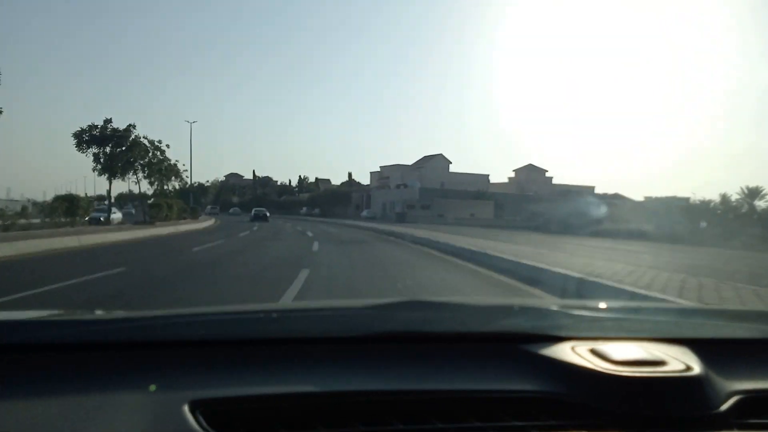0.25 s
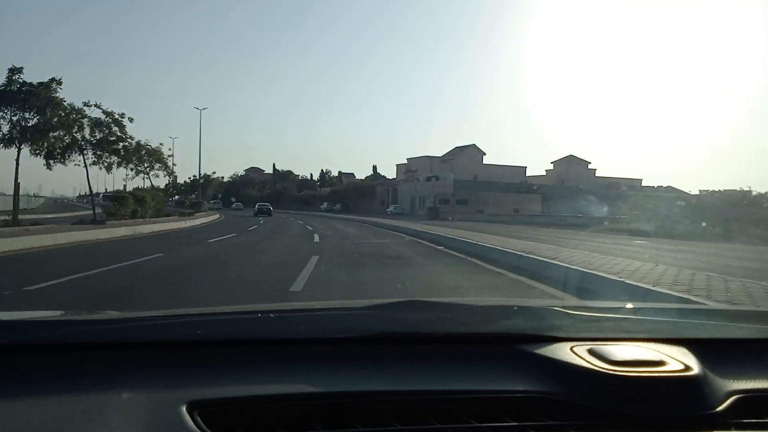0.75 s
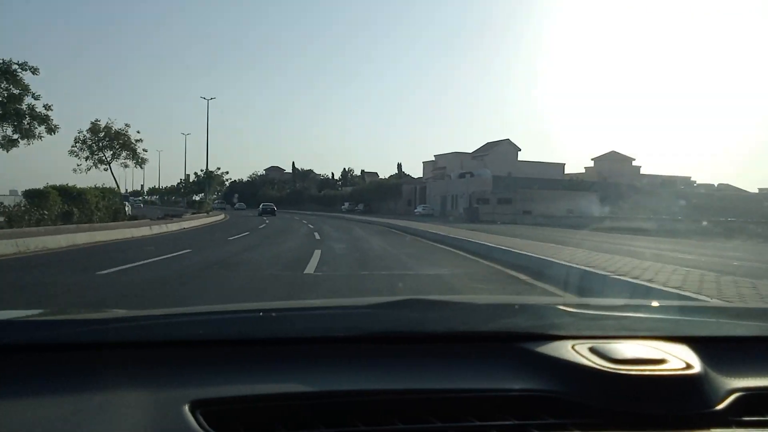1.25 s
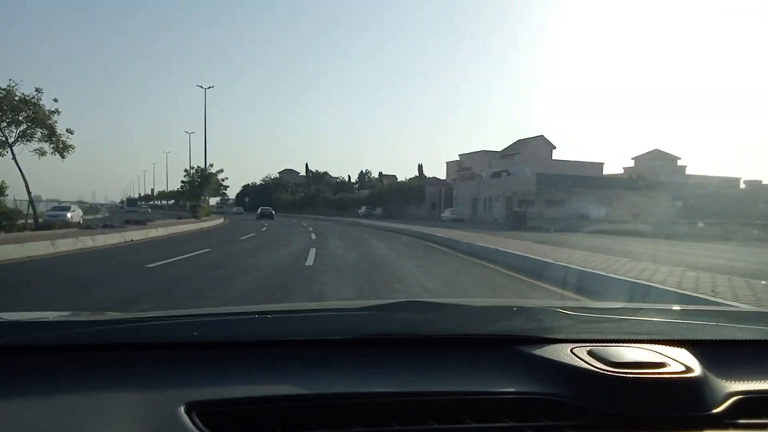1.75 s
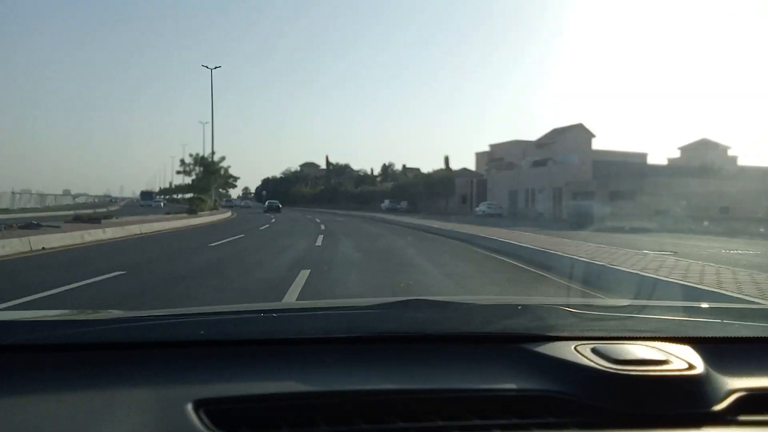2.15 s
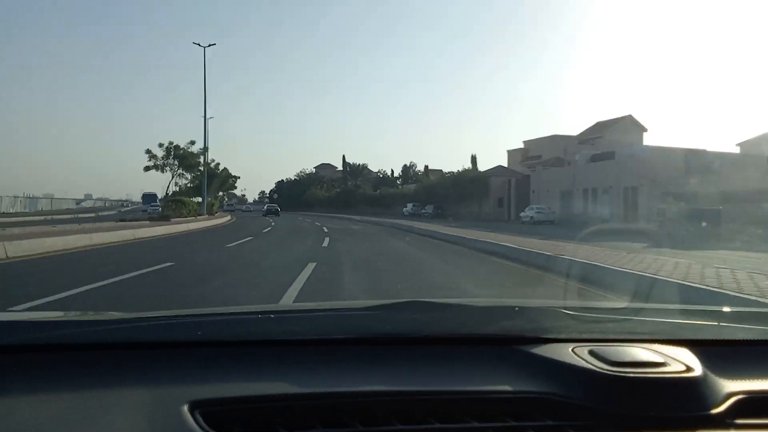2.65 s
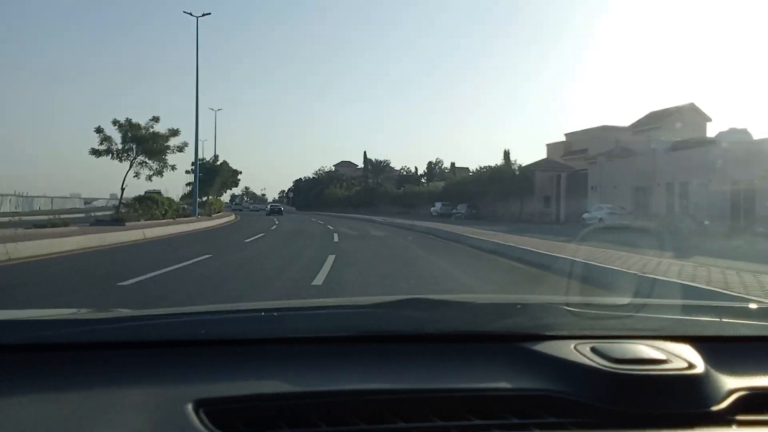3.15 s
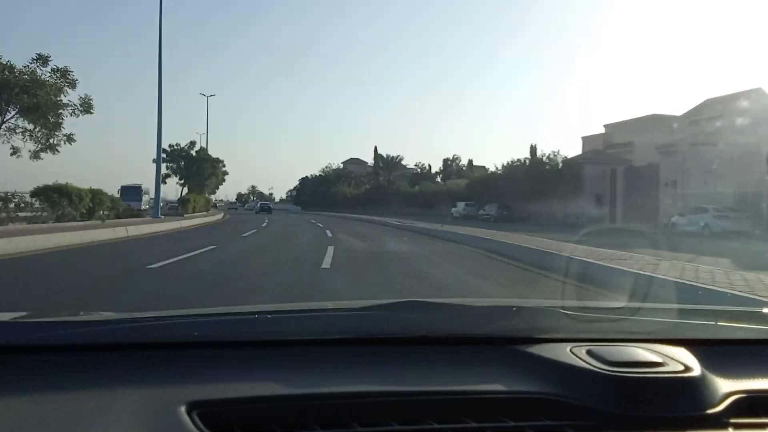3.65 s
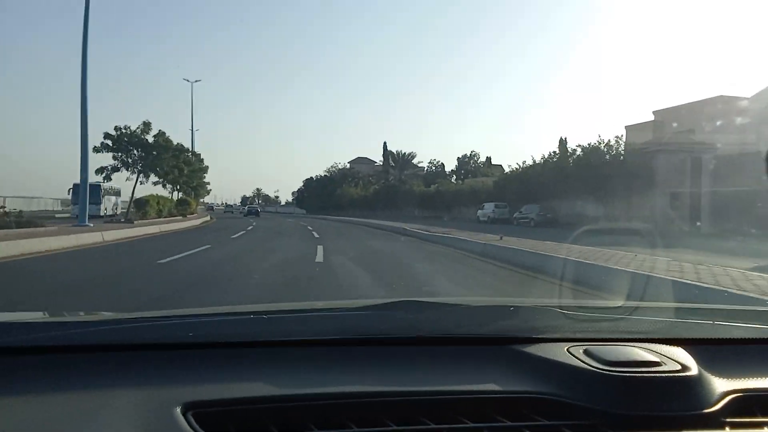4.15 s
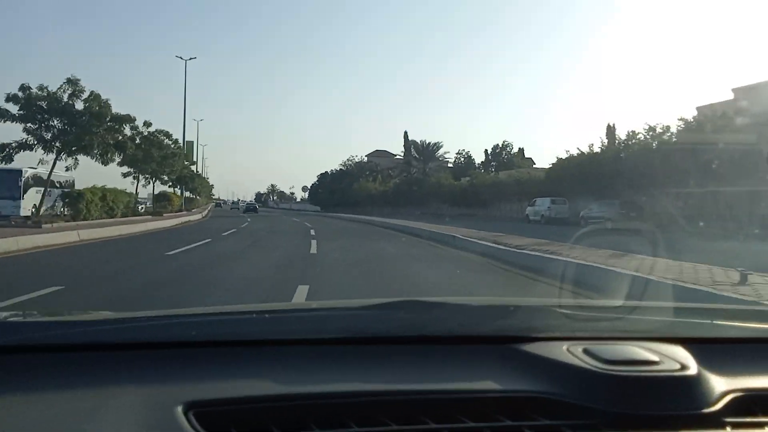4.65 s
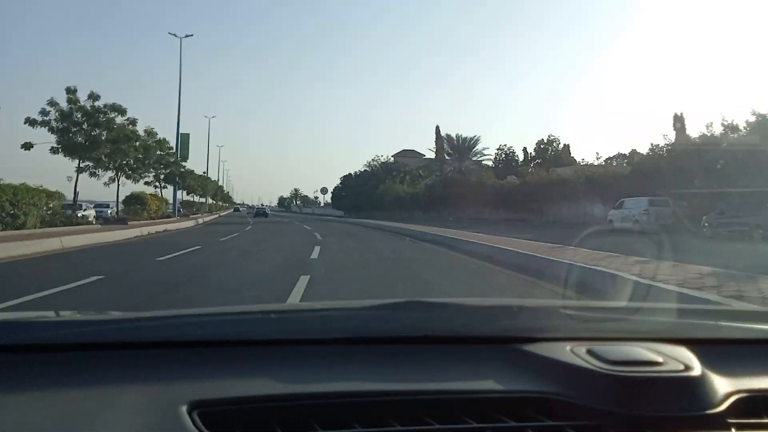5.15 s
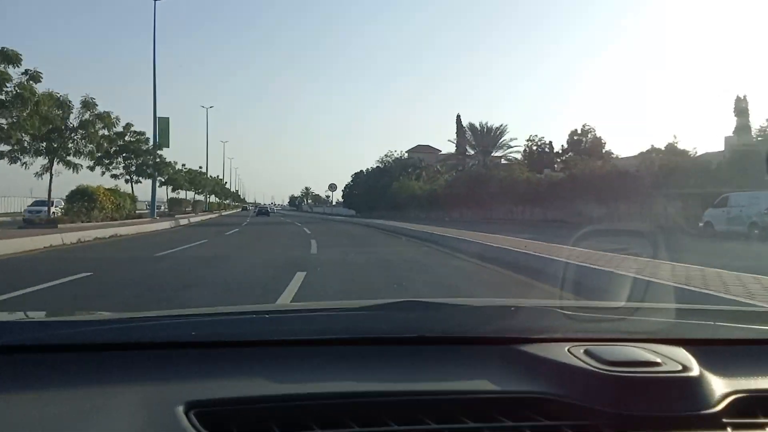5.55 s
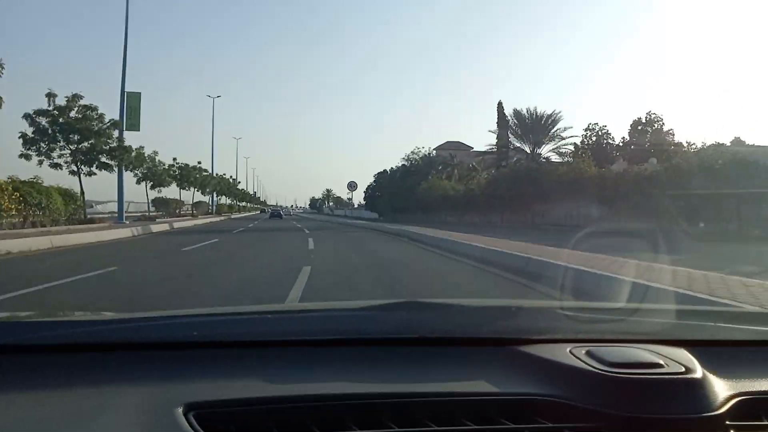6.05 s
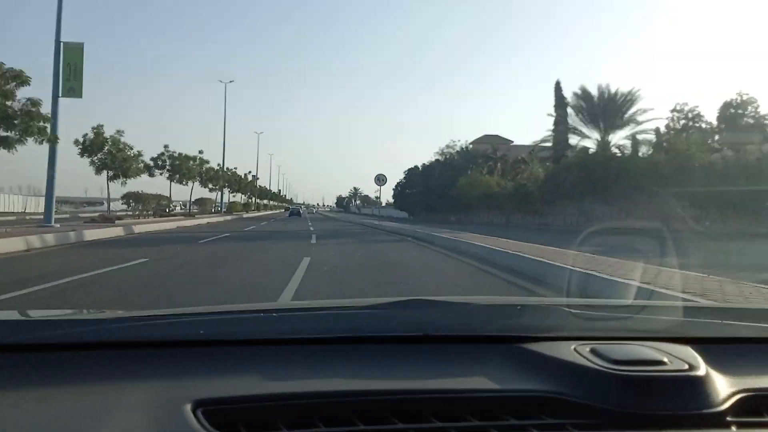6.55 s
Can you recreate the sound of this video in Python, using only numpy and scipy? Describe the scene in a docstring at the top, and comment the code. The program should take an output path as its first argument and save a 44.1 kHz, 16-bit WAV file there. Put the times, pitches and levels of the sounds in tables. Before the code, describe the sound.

Close, boxy cabin sound dominated by low road boom and droning tyres, with a muffled midrange rush that roughens and smooths. Short coarse hums swell as the surface changes. Soft low bumps come irregularly, strong near two, four and six and a half seconds, with dry plastic ticks and brief chatter at the last jolt. Faint engine and airflow stay behind.

```python
"""Tyres rolling on asphalt, heard from behind the dashboard of a cruising car: noise shaped by
resonances of body, tyres, panels and tread, plus a broad rush and humming coarse strips.
Bumps thump as short swelling sines with a noisy slap. Plastic trim ticks, creaks once and
chatters on the heaviest jolt, as struck modes and band-passed clicks.
Behind them: a faint engine hum (wandering sine) and a smooth hiss of air (coloured noise)."""
import sys
import numpy as np
from scipy import signal
from scipy.fft import rfft, irfft
from scipy.io import wavfile
from scipy.ndimage import uniform_filter1d

SR = 44100
rng = np.random.default_rng(int(sys.argv[2]) if len(sys.argv) > 2 else 0)


def dump_mix(stems):
    """Bounce the given channels to the path in sys.argv[1] as a 16-bit WAV at rate SR."""
    frames = np.atleast_2d(stems).T  # one column per channel
    limited = np.clip(frames, -1, 1)  # hard clip at full scale
    pcm = np.round(limited * 32767).astype(np.int16)
    wavfile.write(sys.argv[1], SR, pcm)


N = 299439
TIME_S = np.arange(N) / SR
BIN_HZ = np.arange(N // 2 + 1) * SR / N


def from_db(db):
    """Decibels to amplitude gain."""
    return 10 ** (np.asarray(db) / 20)


def rms_one(x):
    """Scale to unit power."""
    return x / np.sqrt(np.mean(x ** 2) + 1e-20)


def in_time(rows):
    """Interpolate each column of a curve table to every sample."""
    knot_s, *columns = np.transpose(rows)
    return [np.interp(TIME_S, knot_s, column) for column in columns]


def drift(rate_hz):
    """Slow random wander of spread 1: low-passed noise."""
    steps = 4096
    hz = np.arange(steps // 2 + 1) * SR / N
    spectrum = rfft(rng.standard_normal(steps)) / (1 + (hz / rate_hz) ** 2)
    slow = rms_one(irfft(spectrum))
    return np.interp(np.arange(N) * steps / N, np.arange(steps), slow)


def coloured_noise(colour):
    """Noise with a smooth spectrum, falling away below the first point; rms 1."""
    hz = np.maximum(BIN_HZ, 1)
    point_hz, level_db = np.transpose(colour)
    gain = from_db(np.interp(np.log(hz), np.log(point_hz), level_db))
    gain = gain / (1 + (point_hz[0] / 2 / hz) ** 2)
    return rms_one(irfft(rfft(rng.standard_normal(N)) * gain, N))


def shaken(modes):
    """Steep-sided resonances, each shaken at random by the road; rms 1."""
    power = np.zeros(len(BIN_HZ))
    for centre_hz, width_hz, level_db in modes:
        detune = 2 * (BIN_HZ - centre_hz) / width_hz
        power += from_db(level_db) ** 2 / (1 + detune ** 2) ** 2
    return rms_one(irfft(rfft(rng.standard_normal(N)) * np.sqrt(power), N))


def steadied(x, seconds):
    """Hold the slow level at 1 and keep the quick flutter."""
    window = max(int(seconds * SR), 2)
    return x / np.sqrt(uniform_filter1d(x ** 2, window) + 1e-9)


def clicks(rows):
    """One impulse for each (start_s, level_db) row."""
    out = np.zeros(N)
    for start_s, level_db in rows:
        out[min(int(start_s * SR), N - 1)] += from_db(level_db)
    return out


def ring(force, modes):
    """Each impulse sets every mode ringing; neighbouring modes swing in opposite senses."""
    out = np.zeros(N)
    for k, (pitch_hz, level_db, t60_s) in enumerate(modes):
        r = np.exp(-np.log(1000) / (t60_s * SR))
        w = 2 * np.pi * pitch_hz / SR
        mode = signal.lfilter([0, np.sin(w)], [1, -2 * r * np.cos(w), r * r], force + 1e-18)
        out += (-1) ** k * from_db(level_db) * mode
    return out


def cabin(x, wet_db, peak_s):
    """Reflections from glass and seats build up and die quickly; the upholstery dulls them."""
    t = np.arange(SR // 8) / SR
    tail = rng.standard_normal(len(t)) * t * np.exp(-t / peak_s)
    tail = tail / np.linalg.norm(tail)
    tail = signal.sosfilt(signal.butter(1, 2500, fs=SR, output="sos"), tail)
    return x + from_db(wet_db) * signal.fftconvolve(x, tail)[:N]


# colour of the passing air: point_hz, level_db (per Hz, relative)
AIR_COLOUR = [(1200, -3), (2000, 3.5), (2750, 6.5), (3200, -0.5), (3650, -4), (3900, -2), (4500, -3),
              (4720, -6), (4950, -5.5), (5250, -6), (6300, -7), (7200, -12.5), (8200, -20.5), (15000, -30)]
AIR_DB = -71.5


def airflow(flutter_db):
    """Smooth hiss of air along the windscreen, fluttering in level."""
    return from_db(AIR_DB + flutter_db * drift(23)) * coloured_noise(AIR_COLOUR)


ENGINE_HZ, ENGINE_DB = 69.9, -47


def engine(wander, unsteady_db):
    """Firing hum at nearly steady revs: a sine wandering in pitch and level."""
    pitch_hz = ENGINE_HZ * (1 + wander * drift(1.8))
    phase = 2 * np.pi * np.cumsum(pitch_hz) / SR
    return from_db(ENGINE_DB + unsteady_db * drift(8.1)) * np.sin(phase)


CRACK_OCTAVES = 1.5  # bandwidth


def crack(force, pitch_hz):
    """Dry, broad snap of a small plastic part: a band-passed impulse."""
    edges_hz = pitch_hz * 2 ** (CRACK_OCTAVES * np.array([-.5, .5]))
    band = signal.butter(2, edges_hz, "band", fs=SR, output="sos")
    return signal.sosfilt(band, force + 1e-18)


CHATTER_AT_S, CHATTER_HALF_S = 6.51, .045  # heaviest jolt
CHATTER_PEAK_PER_S, CHATTER_DB = 400, -42


def chatter(pitch_hz):
    """Many faint, uneven contacts of loose trim while the car is jolted."""
    rate_per_s = CHATTER_PEAK_PER_S * np.exp(-((TIME_S - CHATTER_AT_S) / CHATTER_HALF_S) ** 2)
    contacts = (rng.random(N) < rate_per_s / SR) * rng.standard_normal(N)
    return from_db(CHATTER_DB) * crack(contacts, pitch_hz)


# dashboard trim snaps: start_s, ring_db, crack_db, crack_hz
TICKS = [(2.0760, -35.5, -12.5, 2250), (2.575, -54, -37, 3500), (3.014, -57, -36, 3000),
         (4.9862, -61, -25, 2200), (5.381, -59, -35, 3000), (6.414, -51, -37, 4600),
         (6.483, -50.5, -32, 3600), (6.5262, -55, -25.5, 1900), (6.633, -38, -12.5, 2250),
         (6.776, -48, -24, 2050)]
# trim resonances: pitch_hz, level_db, t60_s
TRIM_MODES = [(1300, -27, .04), (1650, -17.5, .045), (2280, -24, .016), (2740, -23, .02), (3000, -25, .012),
              (4060, -29, .025), (4450, -8, .012), (4950, -10, .011), (5950, -23, .004), (7000, -23, .003)]
# slips of a creaking plastic joint: start_s, level_db (re strongest)
SLIPS = [(3.0730, -10), (3.0749, 0), (3.0793, -.5), (3.0821, -6), (3.0886, -13)]
# joint resonances: pitch_hz, level_db, t60_s
JOINT_MODES = [(1750, -19, .02), (2600, -19, .015), (3230, -14, .018), (3560, -14, .02), (3900, -7, .022),
               (4160, -6, .024), (4570, -10, .02), (4880, -14, .02), (5700, -15.5, .005), (6300, -22, .005),
               (7450, -33, .012)]
CREAK_DB = -44
TRIM_GAP_HZ, TRIM_GAP_Q = 3650, 3.5  # dead band between knock and ping
TRIM_DULL_HZ = 7000  # padded dashboard muffles the top
GLASS_ECHO_S, GLASS_ECHO_DB = .00202, -7  # nearby windscreen


def trim():
    """Parts snap with a crack and a short ring; a joint creaks in slips; the windscreen echoes."""
    snaps = np.zeros(N)
    for start_s, ring_db, crack_db, crack_hz in TICKS:
        snap = clicks([(start_s, 0)])
        snaps += from_db(ring_db) * ring(snap, TRIM_MODES)
        snaps += from_db(crack_db) * crack(snap, crack_hz)
    snaps = signal.lfilter(*signal.iirnotch(TRIM_GAP_HZ, TRIM_GAP_Q, fs=SR), snaps)
    dull = signal.butter(2, TRIM_DULL_HZ, fs=SR, output="sos")
    snaps = signal.sosfilt(dull, snaps + chatter(pitch_hz=2670))
    creak = from_db(CREAK_DB) * ring(clicks(SLIPS), JOINT_MODES)
    direct = snaps + creak
    echo = from_db(GLASS_ECHO_DB) * np.pad(direct, (int(GLASS_ECHO_S * SR), 0))[:N]
    return cabin(direct + echo, wet_db=-5.5, peak_s=.007)


# bumps under the wheels: crest_s, thump_db, pitch_hz, slap_db
BUMPS = [(0.178, -27, 205, -47.5), (0.313, -30.5, 76, -61), (0.354, -28, 70, -63), (1.095, -26.5, 203, -53),
         (1.549, -23, 170, -56), (1.617, -17, 206.6, -59), (1.671, -24, 67.5, -64), (1.707, -28.5, 85, -62),
         (1.79, -22, 76, -59), (1.809, -25.5, 153, -53), (1.876, -15, 158, -49), (1.942, -19.5, 78, -63),
         (2.055, -24.5, 192, -61), (2.095, -32, 74, -57), (2.131, -25.5, 147, -67), (2.174, -29.5, 75, -65),
         (2.264, -28.5, 66, -62), (2.347, -24, 175, -61), (2.527, -25.5, 149, -57), (2.583, -29, 66, -63),
         (2.661, -23.5, 196, -52), (2.988, -25, 205, -49), (3.842, -15, 189, -48),
         (3.861, -16.5, 204.4, -52), (3.972, -31, 75.6, -59), (4.157, -28, 179, -57),
         (4.366, -33, 76.6, -65), (4.691, -29, 70, -62), (4.831, -23, 191, -59), (4.905, -23, 185, -52),
         (5.028, -21.5, 173, -54), (5.046, -22.5, 186, -56), (5.13, -27.5, 70, -65.5),
         (5.237, -26, 78.4, -62), (5.446, -22.5, 72, -65), (5.543, -22, 193, -59), (5.648, -24, 139, -53),
         (6.273, -22.5, 185, -51.5), (6.352, -23.5, 149, -56), (6.374, -20.5, 69.5, -57.5),
         (6.427, -18.5, 86.6, -54), (6.458, -20.5, 136, -53), (6.513, -14.5, 81, -46),
         (6.533, -15, 119, -50), (6.543, -18, 205.5, -54), (6.557, -20.5, 74, -59),
         (6.769, -22.5, 73, -49.5)]
# colour of the tread's slap: point_hz, level_db (per Hz, relative)
SLAP_COLOUR = [(300, -18.5), (520, -5), (750, -10), (1000, -18.5), (1500, -24), (4000, -47.5), (8000, -69)]


def bumps(contact_s, rise_cycles):
    """Suspension thumps: a few low cycles swell and die away while the tread slaps."""
    out, slap = np.zeros(N), coloured_noise(SLAP_COLOUR)
    for crest_s, thump_db, pitch_hz, slap_db in BUMPS:
        rise_s = contact_s + rise_cycles / pitch_hz  # deep thumps build more slowly
        start = max(int((crest_s - rise_s) * SR), 0)
        age_s = TIME_S[:min(SR // 4, N - start)]
        span = slice(start, start + len(age_s))
        swell = (age_s / rise_s * np.exp(1 - age_s / rise_s)) ** 4
        thump = from_db(thump_db) * np.sin(2 * np.pi * pitch_hz * age_s)
        out[span] += swell * (thump + from_db(slap_db) * slap[span])
    return out


# coarse strips, each humming one wheel, panel or groove: crest_s, half_length_s, level_db, pitch_hz
STRIPS = [(0.181, 0.14, -57.5, 1100), (0.307, 0.041, -50, 560), (0.397, 0.083, -45, 305),
          (0.51, .08, -50, 528), (0.924, 0.075, -40.5, 322), (1.24, .08, -47.5, 582),
          (1.261, 0.065, -40.5, 295), (1.627, 0.061, -41.5, 310), (1.64, 0.057, -52.5, 874),
          (1.76, 0.095, -56, 784), (1.697, 0.093, -44.5, 592), (1.767, 0.087, -47, 400),
          (1.807, .06, -43, 561), (1.812, 0.048, -38, 335), (1.835, 0.094, -50, 924),
          (2.091, .05, -42, 327), (2.556, 0.072, -54.5, 1087), (2.845, 0.063, -41, 324),
          (2.911, 0.047, -43.5, 330), (3.006, 0.11, -50.5, 575), (3.062, 0.15, -57, 888),
          (3.519, 0.062, -43.5, 345), (3.774, 0.13, -49.5, 590), (3.963, .07, -55.5, 930),
          (4.145, .06, -48.5, 577), (4.331, 0.05, -39, 311), (4.416, 0.044, -37, 300),
          (4.522, 0.046, -40.5, 323), (4.609, 0.094, -48, 549), (5.02, 0.098, -51, 585),
          (5.028, 0.048, -39, 332), (5.929, .06, -54.5, 890), (6.121, .07, -47.5, 564),
          (6.132, 0.04, -38, 321), (6.2, 0.063, -55.5, 903), (6.23, .07, -29, 178),
          (6.381, .15, -57.5, 1108), (6.531, .033, -45, 610), (6.661, 0.048, -54.5, 805),
          (6.732, 0.14, -28.5, 211.5)]
STRIP_WIDTH_HZ = 52


def strips():
    """A narrow, rough hum swells and fades as the tyres cross each coarse strip."""
    out = np.zeros(N)
    for crest_s, half_length_s, level_db, pitch_hz in STRIPS:
        near = np.abs(TIME_S - crest_s) < half_length_s
        t = TIME_S[near] - crest_s
        edges_hz = [pitch_hz - STRIP_WIDTH_HZ / 2, pitch_hz + STRIP_WIDTH_HZ / 2]
        band = signal.butter(2, edges_hz, "band", fs=SR, output="sos")
        hum = signal.sosfilt(band, rng.standard_normal(SR))[-len(t):]  # filter already settled
        swell = np.cos(np.pi / 2 * t / half_length_s) ** 2
        swell_rms = np.sqrt(np.mean(swell ** 2))
        out[near] += from_db(level_db) * rms_one(hum * swell) * swell_rms
    return out


LUMPS_PER_S = 11


def lumps(depth_db):
    """Small undulations of the road: quick swells and dips that leave the slow level alone."""
    return steadied(from_db(depth_db * drift(LUMPS_PER_S)), seconds=0.36)


MOTTLE_PER_S, MOTTLE_DB = 5, 2.2


def mottled(x):
    """Let each narrow band of a noise swell and sink slowly by itself; rms 1."""
    centres_hz = np.geomspace(300, 3600, 24)
    spectrum = rfft(x)
    out = np.zeros(N)
    for share in np.eye(len(centres_hz)):  # overlapping triangular bands
        band = irfft(spectrum * np.interp(BIN_HZ, centres_hz, share), N)
        out += band * from_db(MOTTLE_DB * drift(MOTTLE_PER_S))
    return rms_one(out)


# road under the wheels: knot_s, boom_db, drone_db, coarse_db (asphalt coarseness)
ROAD = [(0.0, -34, -42.5, 2), (0.15, -44.5, -35.5, -1.5), (0.37, -32, -36, 0.5), (0.72, -51, -38.5, -2),
        (1.0, -44.5, -37.5, -1), (1.4, -42.5, -38.5, -1), (1.62, -36.5, -29, 2.5), (1.83, -32, -33, 1.5),
        (2.0, -34, -32, 0), (2.24, -33.5, -36.5, -2), (2.4, -43.5, -39, -1), (2.6, -36.5, -37.5, -1.1),
        (3.02, -36.5, -35, 1.5), (3.33, -42.5, -39.5, -0.9), (3.52, -39.5, -35.5, -.5),
        (3.95, -37, -34.5, -0.5), (4.3, -36.5, -36.5, 0), (4.72, -40, -38, 0.5), (5.15, -35.5, -33.5, 1),
        (5.55, -37, -33.5, 0), (5.92, -44, -37.5, -0.5), (6.2, -37.5, -35.5, 0.9), (6.5, -30, -31, 3),
        (6.62, -33.5, -33.5, -1.5), (6.79, -37, -41, 1.5)]
# cabin and body resonances: centre_hz, width_hz, level_db
BOOM_MODES = [(41.5, 14, -15.5), (64.3, 10, -3.5), (70.5, 14, -5), (91, 16, -5), (116, 50, -12)]
# suspension resonances, last the air ring inside the tyres: centre_hz, width_hz, level_db
DRONE_MODES = [(129, 27, -1.5), (147.9, 15, -7), (168.1, 22, -2), (193.7, 29, -2), (214.3, 19, -2.5),
               (225, 12, -1.25), (249.5, 34, -11.5)]
# panel resonances: centre_hz, width_hz, level_db
PANEL_MODES = [(287, 29, -2.5), (318.8, 28, 0.5), (333.6, 30, -0.5), (356.6, 57, -5), (422, 70, -11),
               (462, 38, -14.5), (545, 65, -11.5), (605, 87, -11)]
# grooves of the tread: centre_hz, width_hz, level_db
TREAD_MODES = [(760, 54, -3), (810, 22, 0.5), (892.5, 66, 1), (994, 27, -1), (1088, 31, 0),
               (1144, 59, -4.5), (1319, 48, -6.5), (1453, 39, -8)]
# colour of the tyres' broad rush: point_hz, level_db (per Hz, relative)
RUSH_COLOUR = [(200, -15), (280, 0), (500, 1.5), (660, 0.5), (740, -6.5), (1000, -7), (1150, -11),
               (1400, -15.5), (1750, -14), (2100, -23), (2700, -28.5), (3500, -37), (6000, -57)]
# level on ordinary asphalt, and dB gained per dB of coarseness
PANEL_DB, PANEL_FOLLOWS = -45.5, 1
TREAD_DB, TREAD_FOLLOWS = -58.5, 0.71
RUSH_DB, RUSH_FOLLOWS = -51, 0.93


def rolling():
    """Unevenness booms in the body and drones in the wheels; grain shakes panels and tread."""
    boom_db, drone_db, coarse_db = in_time(ROAD)
    panel_db = PANEL_DB + PANEL_FOLLOWS * coarse_db
    tread_db = TREAD_DB + TREAD_FOLLOWS * coarse_db
    rush_db = RUSH_DB + RUSH_FOLLOWS * coarse_db
    boom = from_db(boom_db) * steadied(shaken(BOOM_MODES), seconds=0.13)
    drone = from_db(drone_db) * steadied(shaken(DRONE_MODES), seconds=0.22)
    panels = from_db(panel_db) * steadied(shaken(PANEL_MODES), seconds=0.11)
    tread = from_db(tread_db) * steadied(shaken(TREAD_MODES), seconds=0.59)
    rush = from_db(rush_db) * mottled(coloured_noise(RUSH_COLOUR))
    rumble = boom * lumps(depth_db=2) + drone * lumps(depth_db=3)
    roar = panels * lumps(depth_db=1.2) + tread * lumps(depth_db=3.0)
    return rumble + roar + rush * lumps(depth_db=1.9)


def scene():
    """Sum all sources at one microphone."""
    background = airflow(flutter_db=0.77) + engine(wander=0.013, unsteady_db=2.5)
    road = bumps(contact_s=.005, rise_cycles=1.81) + strips() + rolling()
    return (background + trim() + road)[None]


CUTOFF_HZ = 15700


def record(dry):
    """The microphone loses the deepest bass and the high treble; the top is cut."""
    x = signal.sosfilt(signal.butter(2, 32, "high", fs=SR, output="sos"), dry)
    dull = signal.sosfilt(signal.butter(12, 7700, fs=SR, output="sos"), x)
    x = dull + from_db(-92.0) * rng.standard_normal(x.shape)  # faint electronic hiss
    x = x * np.clip(np.minimum(TIME_S, TIME_S[::-1]) / .004, 0, 1)  # soft ends
    return signal.sosfilt(signal.cheby2(12, 70, CUTOFF_HZ, fs=SR, output="sos"), x)


dry = scene()
out = record(dry)
dump_mix(out)
```